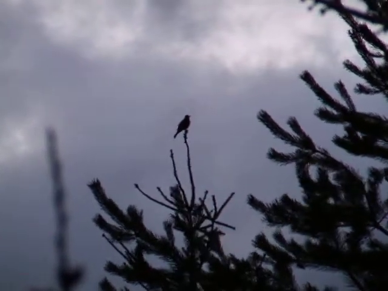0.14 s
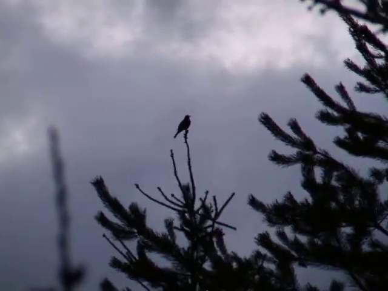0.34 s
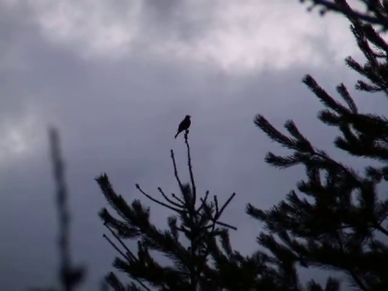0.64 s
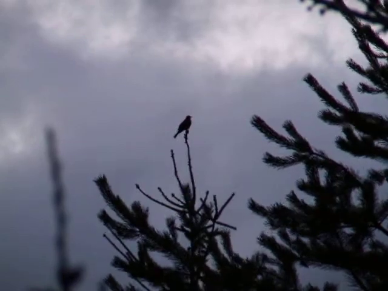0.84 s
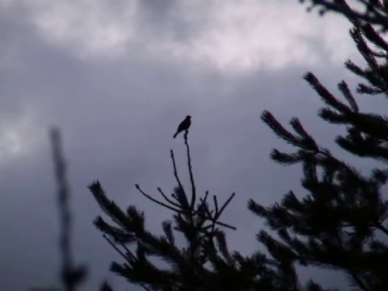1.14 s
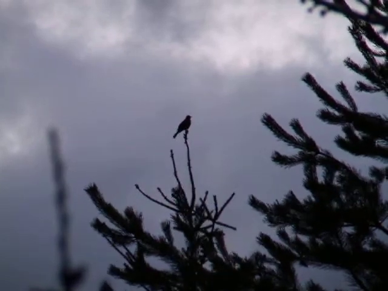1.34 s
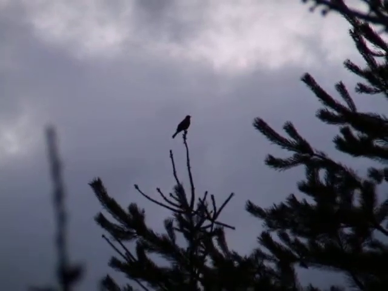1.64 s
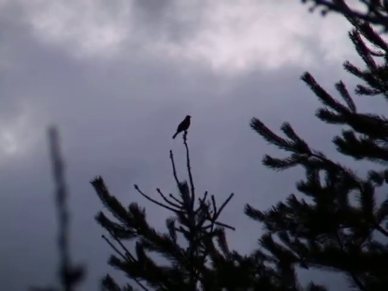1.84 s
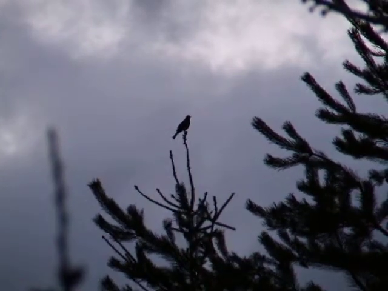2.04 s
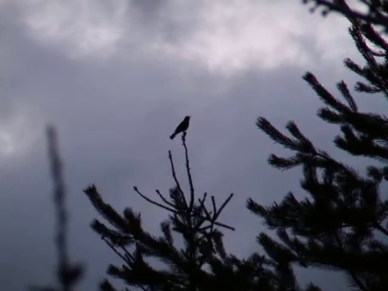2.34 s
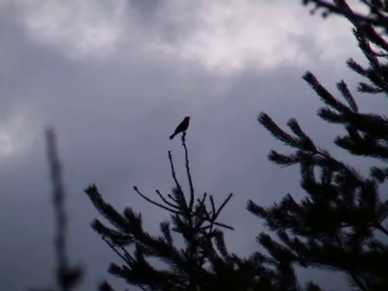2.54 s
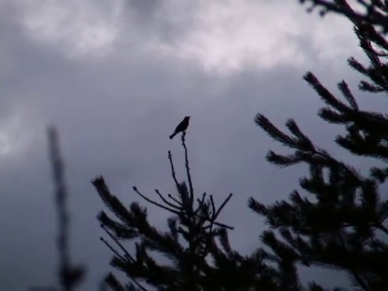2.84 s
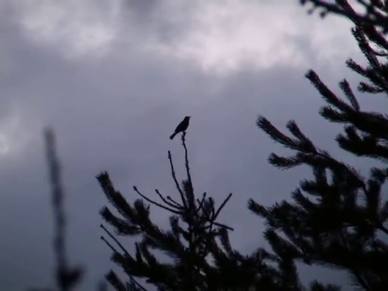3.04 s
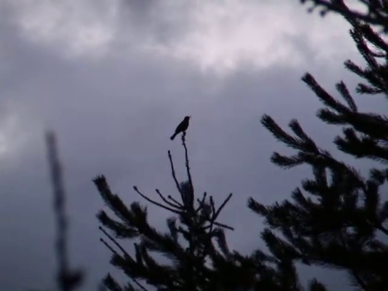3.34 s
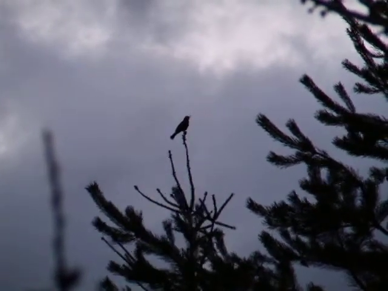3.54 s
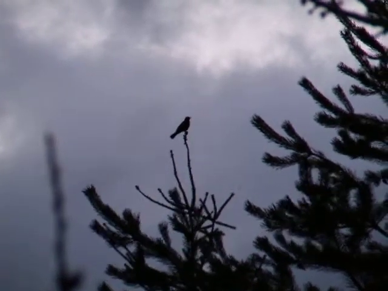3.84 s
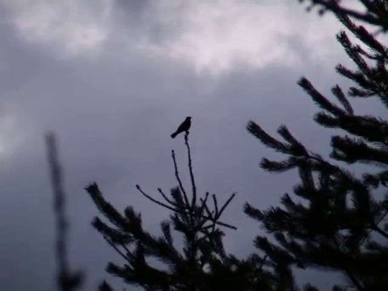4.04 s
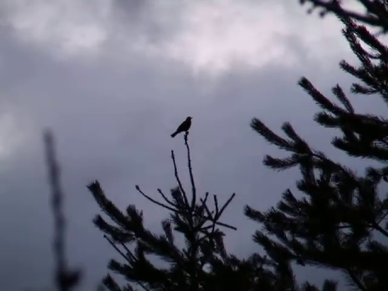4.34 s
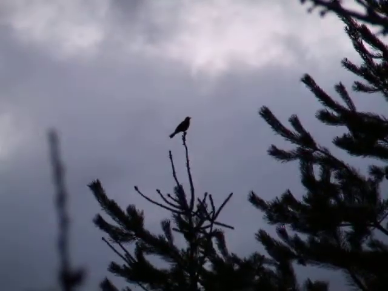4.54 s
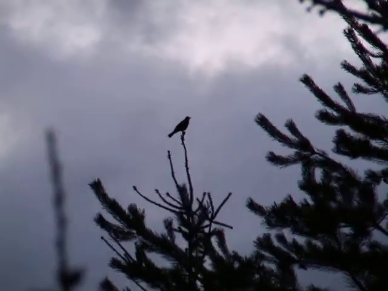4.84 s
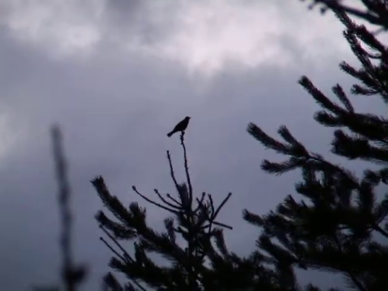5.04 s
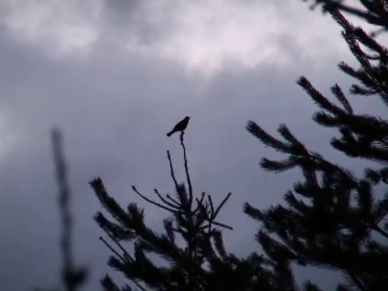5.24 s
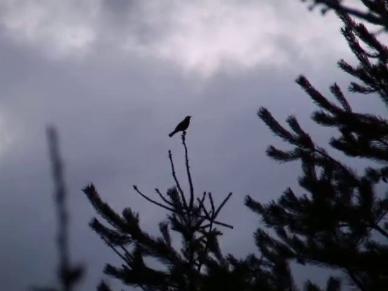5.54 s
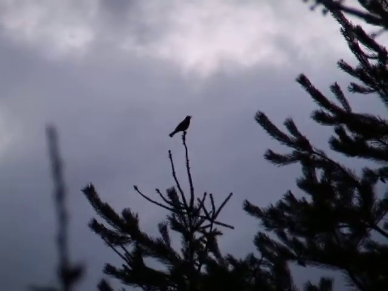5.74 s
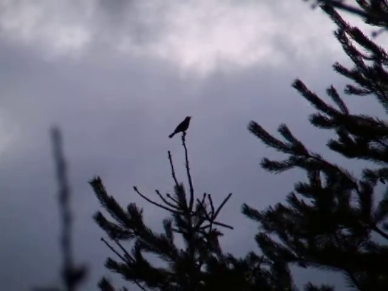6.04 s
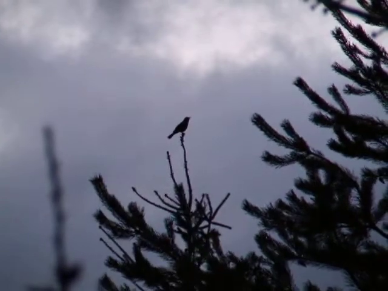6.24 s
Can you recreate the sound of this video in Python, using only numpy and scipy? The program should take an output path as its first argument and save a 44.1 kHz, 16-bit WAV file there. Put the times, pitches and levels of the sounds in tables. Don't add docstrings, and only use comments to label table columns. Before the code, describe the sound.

A small, low-quality camera microphone picks up a blackbird singing among conifers, with quick light echo from the trees. Distant birds open quietly, then rounded whistles and quick falling notes lead into faint, very high twittering. The song pauses while dull gusts bump the microphone and faint hoots sound far off. A second phrase follows, rippling, bursting and sagging, over steady gritty hiss and thin whine.

```python
import sys
import numpy as np
from scipy import signal
from scipy.fft import rfft, irfft
from scipy.io import wavfile
from scipy.ndimage import uniform_filter1d, map_coordinates

SR = 44100
rng = np.random.default_rng(int(sys.argv[2]) if len(sys.argv) > 2 else 0)


def elevation(decibels):
    levels = np.asarray(decibels, float)
    return 10 ** (levels / 20)


def wav_out(sig):
    wavfile.write(sys.argv[1], SR, np.round(np.clip(np.atleast_2d(sig).T, -1, 1) * 32767).astype(np.int16))


N = 282240


def unit(x):
    return x / np.sqrt(np.mean(x ** 2) + 1e-20)


def along(points, hz):
    f, v = np.transpose(points)
    return np.interp(np.log(hz + 1), np.log(f + 1), v)


def wobble(rate_hz):
    knots = rng.standard_normal(int(N * rate_hz / SR) + 4)
    return map_coordinates(knots, [np.arange(N) * rate_hz / SR])


def noise(spectrum):
    hz = np.fft.rfftfreq(N, 1 / SR)
    white = rfft(rng.standard_normal(N))
    return unit(irfft(white * elevation(along(spectrum, hz)), N))


def shaped(row, shape, scoop=1):
    s, length_s, from_hz, to_hz, peak_db = row
    bend = [scoop] + [1] * (len(shape) - 2) + [scoop]
    return [(s + u * length_s, b * (from_hz + g * (to_hz - from_hz)), peak_db + d)
            for (u, g, d), b in zip(shape, bend)]


def sing(out, rows, partials, warble_hz=0, depth_hz=0):
    s, hz, db = np.transpose(sorted(rows))
    first = max(int(s[0] * SR), 0)
    t = np.arange(first, min(int(s[-1] * SR), N)) / SR
    pitch_hz = uniform_filter1d(np.interp(t, s, hz), size=130, mode="nearest")
    drift = np.cumsum(rng.standard_normal(SR // 2))[:len(t)] * .055
    beat = 2 * np.pi * warble_hz * t + drift
    pitch_hz = pitch_hz + depth_hz * np.sin(beat)
    pulse = 1 + min(.004 * depth_hz, .6) * np.cos(beat)
    phase = 2 * np.pi * (np.cumsum(pitch_hz) / SR + rng.random())
    edge = np.clip(np.minimum(t - t[0], t[-1] - t) / 0.0021, 0, 1)
    tone = sum(elevation(level_db) * np.sin(k * phase) for k, level_db in partials)
    out[first:first + len(t)] += np.sqrt(2) * elevation(np.interp(t, s, db)) * edge * pulse * tone


def distant(notes, warble_hz, depth_hz):
    out = np.zeros(N)
    for rows in notes:
        sing(out, rows, [(1, -1.5)], warble_hz, depth_hz)
    return out * elevation(1.6 * wobble(40))


# (t/s, length/s, f from/Hz, f to/Hz, level/dB)
TRILL_NOTES = [(.04, 0.041, 7590, 7060, -52), (0.082, .05, 7850, 6850, -50),
               (0.131, 0.053, 7860, 6480, -48), (.18, .05, 7640, 6400, -50), (0.231, .03, 6900, 6540, -59),
               (.04, 0.037, 4500, 4300, -64.5), (0.139, .04, 4470, 4200, -65)]
# (share of length, share of glide, level/dB)
VEE_SHAPE = [(0, 0, -12), (.3, .6, -5), (.58, 1, 0), (.8, .6, -2), (1, .05, -8)]


def distant_trill():
    return distant([shaped(row, VEE_SHAPE) for row in TRILL_NOTES], warble_hz=240, depth_hz=120)


# (f/Hz, density/dB per Hz)
AIR_SPECTRUM = [(10, 4), (60, -7.5), (150, -8.5), (400, -5), (800, -9.5), (1500, -14), (4000, -16.5),
                (8000, -16.5)]


def air():
    return elevation(-54 + .4 * wobble(3)) * noise(AIR_SPECTRUM)


def whine(t):
    line_hz, frame_hz = 15734.27, 29.97
    flips = np.sin(np.pi * frame_hz * (t - .0236))
    return elevation(-54.5) * np.tanh(6 * flips) * np.sin(np.pi * line_hz * t)


# (delay/s, level/dB)
ECHO_PATHS = [(.0078, -12), (.0092, -15), (.0165, -18), (.031, -19)]
# (f/Hz, level/dB)
BOUGH_COLOUR = [(1500, -3), (3500, -3), (4400, 13), (5300, 5), (7000, 2)]
# (f/Hz, t60/s)
HAZE_T60 = [(500, .5), (2200, .6), (3500, .45), (6500, .3), (9000, .2)]


def trees(x, haze_db, echo_db):
    t = np.arange(SR) / SR
    echoes = np.zeros(SR)
    for delay_s, db in ECHO_PATHS:
        echoes[int(delay_s * SR)] = elevation(db + echo_db)
    echoes = irfft(rfft(echoes) * elevation(along(BOUGH_COLOUR, np.arange(SR // 2 + 1))), SR)
    hz, frame_s, z = signal.stft(rng.standard_normal((2, SR)), SR, nperseg=256)
    decay = elevation(-60 * frame_s / along(HAZE_T60, hz)[:, None])
    haze = signal.istft(z * decay, SR, nperseg=256)[1][:, :SR]
    haze = haze * (1 - np.exp(-t / .008))
    haze = haze / np.linalg.norm(haze)
    x = x + signal.fftconvolve(x, echoes)[:N]
    haze = signal.fftconvolve(x[None], haze, axes=1)[:, :N]
    sway = 1.6 * wobble(40)
    haze = np.sqrt(2) * (np.cos(sway) * haze[0] + np.sin(sway) * haze[1])
    return x + elevation(haze_db) * haze


# (t/s, length/s, f from/Hz, f to/Hz, level/dB)
FAR_CALLS = [(0.701, .13, 2251, 2197, -56), (0.879, .13, 2127, 2017, -58), (1.051, .1, 3010, 3040, -63.5),
             (1.049, .11, 2296, 2230, -60.5), (1.201, 0.12, 2087, 2135, -57.5),
             (2.019, .16, 2063, 2100, -60), (0.93, .1, 2010, 1970, -62), (6.075, .1, 2120, 2105, -55)]
# (t/s, length/s, f from/Hz, f to/Hz, level/dB)
FAR_HOOTS = [(4.652, .07, 715, 735, -51), (4.68, .06, 447, 435, -50.5), (6.3, .1, 447, 435, -55.5),
             (4.645, .045, 645, 642, -55.5), (4.66, .05, 885, 970, -63), (4.64, 0.12, 1492, 1498, -63.5),
             (3.668, .022, 374, 330, -52)]
# (t/s, f/Hz, level/dB)
FAR_WHISTLES = [
    [(1.28, 2868, -68), (1.33, 2880, -58), (1.39, 2890, -49.5), (1.44, 2885, -55), (1.52, 2879, -56),
     (1.58, 2850, -61), (1.64, 2830, -62), (1.7, 2850, -71)],
    [(1.92, 1943, -71.5), (2.0, 2059, -57.5), (2.06, 2197, -57), (2.15, 2195, -60.5), (2.24, 2182, -65.5)],
]
# (share of length, share of glide, level/dB)
FAR_SHAPE = [(0, 0, -13), (.2, 0.11, -0.5), (0.601, .5, -5), (1, 1, -15.5)]


def distant_calls():
    short = [shaped(row, FAR_SHAPE) for row in FAR_CALLS + FAR_HOOTS]
    return distant(short + FAR_WHISTLES, warble_hz=45, depth_hz=18)


SCOOP = .94
# (share of length, share of glide, level/dB)
FADE_SHAPE = [(0, 0, -18), (.18, 0.05, 0), (.5, 0.47, -2), (.85, .9, -6), (1, 1, -14)]
# (t/s, length/s, f from/Hz, f to/Hz, level/dB)
REEDY_NOTES = [(2.47, .065, 860, 905, -34.5), (2.53, .09, 897, 880, -56.5), (5.465, .12, 835, 855, -52),
               (2.17, 0.033, 960, 930, -54.5), (2.372, .048, 900, 880, -59.5)]
# (multiple, level/dB)
REED_PARTIALS = [(3, -1), (4, -12), (5, -29.5), (6, -22.5), (8, -25.5)]


def reedy_voice(out):
    opens_s = .014
    for s, length_s, from_hz, to_hz, db in REEDY_NOTES:
        whole = (s, length_s, from_hz, to_hz, db)
        late = (s + opens_s, length_s - opens_s, from_hz, to_hz, db)
        sing(out, shaped(whole, FADE_SHAPE, SCOOP), REED_PARTIALS[:1], 90, 9)
        sing(out, shaped(late, FADE_SHAPE, SCOOP), REED_PARTIALS[1:], 90, 12)


# (t/s, f/Hz, level/dB)
FIRST_PHRASE = [
    [(2.5, 1790, -56), (2.53, 1825, -44.5), (2.56, 1788, -38), (2.585, 1745, -34.5), (2.62, 1735, -36.5),
     (2.632, 1690, -57.5)],
    [(2.638, 2150, -47), (2.651, 2193, -34), (2.673, 2196, -36), (2.715, 2203, -29), (2.74, 2197, -29.5),
     (2.773, 2218, -35), (2.803, 2190, -31.5), (2.825, 2160, -36), (2.845, 2140, -48)],
    [(2.975, 2150, -50), (2.987, 2290, -39), (3.003, 2290, -43), (3.02, 2240, -34), (3.04, 2250, -40),
     (3.049, 2270, -36), (3.058, 1700, -47), (3.078, 1230, -57), (3.165, 990, -65)],
    [(3.04, 2855, -58.5), (3.055, 2652, -36.5), (3.08, 2440, -42), (3.11, 2417, -35), (3.132, 2357, -40.5),
     (3.143, 2060, -42.5), (3.155, 1820, -55)],
    [(3.329, 2750, -50), (3.334, 3500, -41), (3.34, 5210, -37), (3.349, 5436, -43.5), (3.358, 2530, -53),
     (3.37, 2400, -44), (3.386, 2200, -54)],
    [(2.633, 1900, -44), (2.64, 2060, -42), (2.672, 2073, -41), (2.7, 2010, -46), (2.746, 2032, -35),
     (2.794, 2040, -40), (2.83, 2069, -35), (2.846, 2050, -46)],
    [(2.942, 2700, -58), (2.951, 2800, -48), (2.956, 2880, -33), (2.977, 2990, -32), (2.982, 3000, -44)],
]
# (t/s, f/Hz, level/dB)
SECOND_PHRASE = [
    [(5.6, 1892, -44), (5.617, 2026, -30), (5.628, 1925, -41), (5.638, 2030, -33), (5.664, 2010, -34),
     (5.671, 1990, -48), (5.677, 2030, -38), (5.691, 2060, -33), (5.715, 2110, -47)],
    [(5.746, 1980, -50), (5.756, 2330, -42), (5.761, 2410, -25.5), (5.775, 2482, -36), (5.785, 2490, -34),
     (5.792, 2450, -21), (5.803, 2330, -28), (5.818, 1981, -46.5)],
    [(5.915, 2870, -60), (5.94, 2850, -52), (5.96, 3216, -46), (5.98, 3320, -38), (5.993, 3246, -43.5),
     (6.003, 3007, -32.5)],
    [(5.998, 3042, -40), (6.01, 2965, -29.5), (6.05, 2975, -29.5), (6.126, 2905, -30), (6.165, 2858, -30),
     (6.18, 2820, -43), (6.2, 2785, -42), (6.213, 2790, -36), (6.275, 2770, -50)],
    [(6.272, 3745, -52), (6.281, 3250, -44), (6.286, 2950, -32), (6.3, 2264, -31.5), (6.325, 2029, -29),
     (6.335, 1800, -38), (6.36, 1897, -37.5), (6.38, 1760, -39), (6.4, 1900, -46.5)],
    [(5.885, 2258, -50), (5.905, 2189, -35), (5.915, 2145, -41), (5.961, 2136, -37), (5.973, 2116, -48),
     (5.985, 2093, -37), (6.001, 2122, -39), (6.015, 2026, -54)],
]
# (octave/dB, twelfth/dB, warble rate/Hz, warble depth/Hz)
LEAD_TIMBRE = [(-21.5, -27.5, 79, 7), (-36, -28, 115, 65), (-10, -15, 120, 14), (-30, -44, 110, 75),
               (-12, -36.5, 320, 150), (-36, -36, 130, 35), (-40, -42, 60, 6), (-37.5, -48, 90, 30),
               (-38, -42, 72, 8), (-30.5, -50, 60, 4.3), (-31, -57, 60, 3.3), (-37.5, -32.5, 170, 96),
               (-26, -22, 76, 15)]
# (t/s, length/s, f from/Hz, f to/Hz, level/dB)
OPENING_NOTE = [(2.175, .073, 1926, 1937, -29.5)]
HELD_NOTES = [(5.462, .113, 1681, 1702, -42.5), (5.57, .032, 1856, 1861, -41)]
FADING_NOTES = [(2.243, .057, 1744, 1614, -44), (2.343, .09, 1860, 1771, -41),
                (2.47, .04, 1743, 1753, -51.5)]
BRASSY_NOTES = [(5.414, .062, 2459, 2487, -42.5)]
RATTLE_FALLS = [(2.267, .022, 2862, 1880, -40), (2.297, .022, 2773, 1870, -38),
                (2.326, .02, 2407, 1795, -37)]
QUICK_FALLS = [(3.044, .035, 5050, 2980, -44), (3.045, .016, 7290, 3600, -48.5),
               (3.048, .02, 3910, 2502, -46), (3.266, .014, 7620, 6413, -41.5),
               (3.281, .013, 7560, 6804, -43), (3.362, .022, 2647, 1983, -47.5),
               (4.05, .02, 4135, 1914, -51.5), (4.058, .018, 2213, 1720, -51),
               (5.478, .027, 2750, 2130, -50)]
# (share of length, share of glide, level/dB)
SWELL_SHAPE = [(0, 0, -27.5), (.25, .1, -11), (.65, .6, 0), (.88, .95, -3), (1, 0.98, -16)]
HOLD_SHAPE = [(0, 0, -20), (.2, .2, -4.5), (.5, .5, -1), (.85, .9, -0.5), (1, 1, -11.5)]
DROP_SHAPE = [(0, 0, -10), (.3, .65, -3), (.55, .9, 1), (1, 0.94, -14)]
# (octave/dB, twelfth/dB, warble rate/Hz, warble depth/Hz)
PURE, HUSKY, BRASS = (-44.5, -42, 60, 6), (-28, -24, 76, 22), (-12, -34.5, 59.5, 8)
QUICK, ROUGH = (-40, -39.5, 250, 59), (-32, -38.5, 280, 219.5)


def whistles(out):
    notes = list(zip(FIRST_PHRASE + SECOND_PHRASE, LEAD_TIMBRE))
    for table, shape, scoop, voice in [(OPENING_NOTE, SWELL_SHAPE, SCOOP, PURE),
                                       (HELD_NOTES, HOLD_SHAPE, SCOOP, PURE),
                                       (FADING_NOTES, FADE_SHAPE, SCOOP, HUSKY),
                                       (BRASSY_NOTES, HOLD_SHAPE, 1, BRASS),
                                       (RATTLE_FALLS, DROP_SHAPE, 1, ROUGH),
                                       (QUICK_FALLS, DROP_SHAPE, 1, QUICK)]:
        notes += [(shaped(row, shape, scoop), voice) for row in table]
    for rows, (octave_db, twelfth_db, warble_hz, depth_hz) in notes:
        sing(out, rows, [(1, -1.0), (2, octave_db), (3, twelfth_db)], warble_hz, depth_hz)


# (t/s, length/s, f from/Hz, f to/Hz, level/dB)
FLICK_NOTES = [(2.974, 0.016, 5180, 4900, -52.5), (2.98, .025, 6300, 7100, -53.5),
               (5.95, .05, 5300, 5300, -60.5), (5.485, .095, 3390, 3400, -60),
               (5.465, 0.026, 4120, 4230, -58), (3.33, .042, 7000, 6600, -46),
               (3.324, .012, 2700, 3100, -45.5), (2.64, .04, 2400, 2430, -48), (2.7, .07, 2420, 2360, -46),
               (3.07, .07, 3600, 3350, -55), (2.985, .012, 3900, 3300, -54), (3.458, .014, 2600, 1800, -56),
               (3.553, .012, 2600, 1900, -56), (3.735, .014, 2100, 2150, -57),
               (3.782, .012, 2050, 2050, -55)]


def flicks(out):
    for row in FLICK_NOTES:
        sing(out, shaped(row, FADE_SHAPE), [(1, 0)], 250, 70)


# (t/s, climb/s, hold/s, top f/Hz, level/dB)
TWITTER_NOTES = [(3.286, .011, .026, 6673, -40), (3.413, .019, .024, 6600, -42),
                 (3.472, .007, .02, 6490, -42.5), (3.524, .007, .018, 6490, -44.5),
                 (3.574, .007, .019, 6430, -45), (3.626, .008, .021, 6475, -48),
                 (3.686, .016, .021, 6660, -46), (3.746, .006, .02, 6473, -46),
                 (3.795, .007, .022, 6480, -46)]
# (share of climb, share of hold, lag/s, f ratio to top, level/dB)
ARCH_SHAPE = [(0, 0, 0, .56, -11), (.5, 0, 0, .8, -6), (1, 0, 0, .95, -3), (1, .4, 0, .99, -3),
              (1, 1, 0, 1.0, -1), (1, 1, .004, .74, -6), (1, 1, .009, .55, -11)]
# (share of hold, f ratio to top, level/dB)
UPPER_SHAPE = [(-.15, 1.09, -12), (.15, 1.13, -1), (.5, 1.14, 0), (.85, 1.13, -2), (1.05, 1.09, -11)]


def twitters():
    out = np.zeros(N)
    upper_db = -49
    for s, climb_s, hold_s, top_hz, db in TWITTER_NOTES:
        arch = [(s + u * climb_s + v * hold_s + lag_s, ratio * top_hz, db + d)
                for u, v, lag_s, ratio, d in ARCH_SHAPE]
        upper = [(s + climb_s + u * hold_s, ratio * top_hz, upper_db + d) for u, ratio, d in UPPER_SHAPE]
        sing(out, arch, [(1, 0)], 330, 110)
        sing(out, upper, [(1, 0)], 330, 40)
    return out * elevation(2.6 * wobble(220))


def blackbird():
    out = np.zeros(N)
    reedy_voice(out)
    whistles(out)
    flicks(out)
    return (out + twitters()) * elevation(1.1 * wobble(70))


# (peak t/s, width/s, buffet level/dB, sharpness/dB)
WIND_PUFFS = [(3.299, .015, -42.5, -19), (3.67, .03, -53.5, -14), (3.75, .04, -49, -27),
              (3.82, .05, -42, -4.5), (3.94, 0.032, -41.5, -14.5), (4.05, .035, -42.5, -9),
              (4.14, .03, -42, -17.5), (4.501, .04, -42, -19.5), (4.56, .02, -45, -9.5),
              (4.61, .02, -47.5, -30), (4.689, .035, -41.5, -26.5), (4.77, .05, -38.5, -13),
              (4.85, .04, -46.5, -6), (4.96, 0.043, -37.5, -5), (5.03, .04, -43.5, -5),
              (5.21, .045, -36.5, -14.5), (5.3, .04, -45.5, 0.5), (5.37, .04, -36.5, -4.5),
              (5.449, 0.032, -39.5, -7), (5.54, .035, -42.5, -10.5), (5.6, .05, -46.5, -1),
              (5.7, .05, -53, -4.5), (5.96, .08, -64, -10.5)]
# (f/Hz, density/dB per Hz)
BUFFET_SPECTRUM = [(8, -6), (30, -0.5), (60, -3), (100, -17.5), (200, -40.5), (400, -95.5)]
SLAP_SPECTRUM = [(40, -40.5), (90, 2), (150, -6.5), (300, -23), (500, -31.5), (1200, -58.5)]


def wind():
    s, width_s, buffet_db, sharp_db = np.transpose(WIND_PUFFS)[:, :, None]
    bells = elevation(buffet_db) * np.exp(-((np.arange(N) / SR - s) / width_s) ** 2)
    lumps = wobble(16)
    buffet = unit(noise(BUFFET_SPECTRUM) * elevation(1.5 * lumps))
    slap = unit(noise(SLAP_SPECTRUM) * elevation(2.4 * lumps + 3 * wobble(35)))
    return bells.sum(0) * buffet + (bells * elevation(sharp_db)).sum(0) * slap


def scene():
    far = trees(distant_trill() + distant_calls(), haze_db=-5, echo_db=-4)
    near = trees(blackbird(), haze_db=-12, echo_db=0)
    return (far + air() + near + wind())[None]


def top_cut(x):
    return signal.sosfilt(signal.butter(12, 9030, fs=SR, output="sos"), x)


def record(dry):
    rate_hz, top_hz, step = 16000, 9010, .00545
    count = N * rate_hz // SR
    x = signal.resample(dry[0], count) + whine(np.arange(count) / rate_hz)
    x = step * np.floor(x / step + .06)
    spectrum = np.fft.fft(x) * N / count
    hz = np.fft.rfftfreq(N, 1 / SR)
    mirrored = spectrum[np.arange(len(hz)) % count]
    slope = np.clip((hz - rate_hz / 2) / 1250, -1, 1)
    playback = .5 - .5 * np.sin(slope * np.pi / 2)
    wide = mirrored * playback * (hz < top_hz)
    return top_cut(irfft(wide, N)[None])


dry = scene()
out = record(dry)
wav_out(out)
```